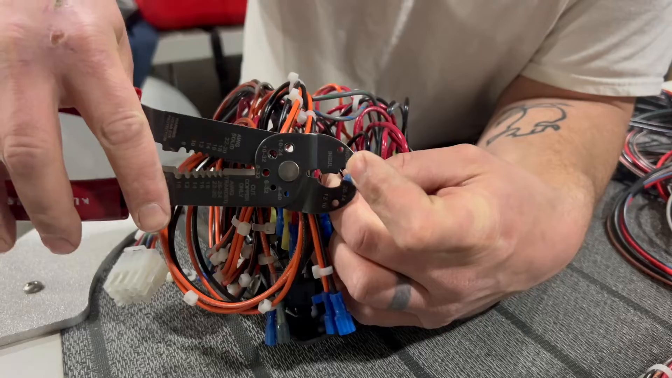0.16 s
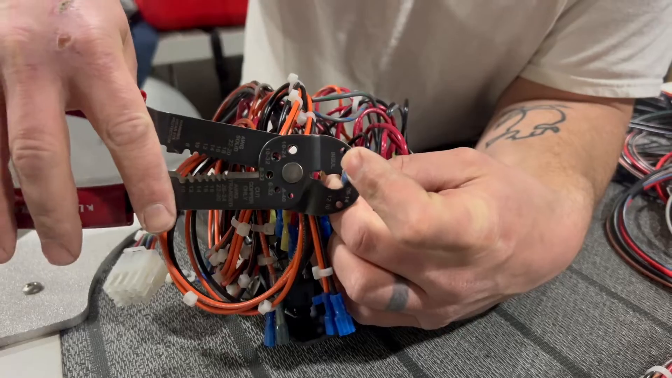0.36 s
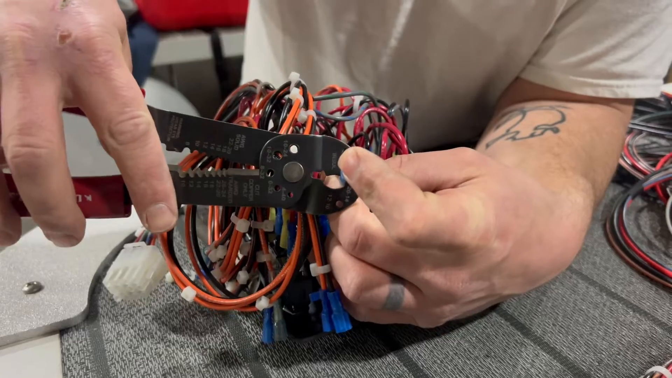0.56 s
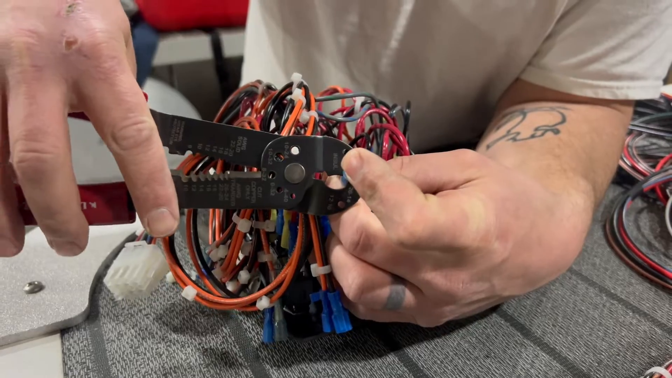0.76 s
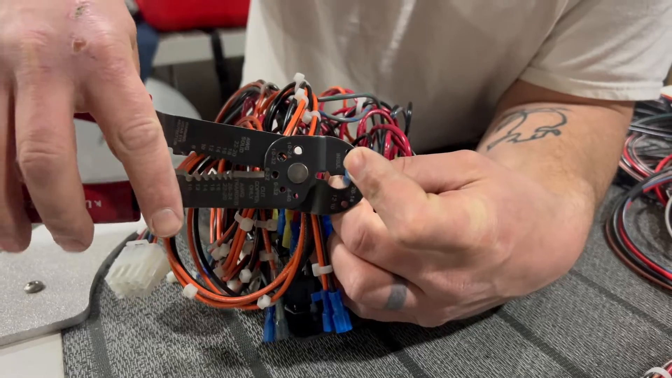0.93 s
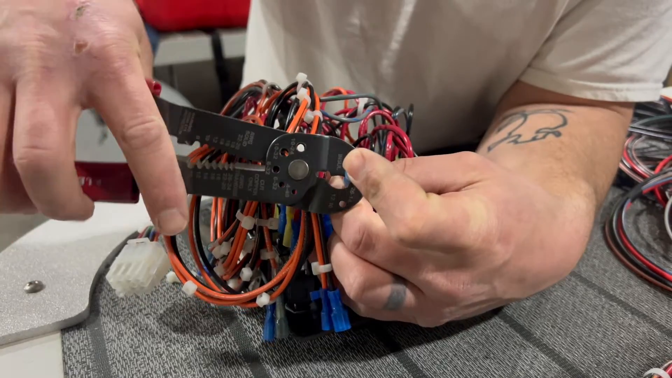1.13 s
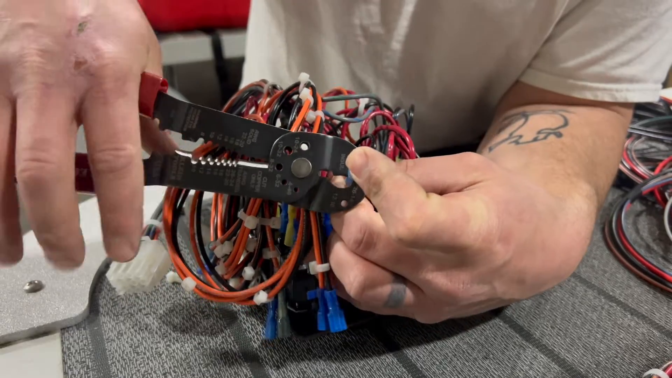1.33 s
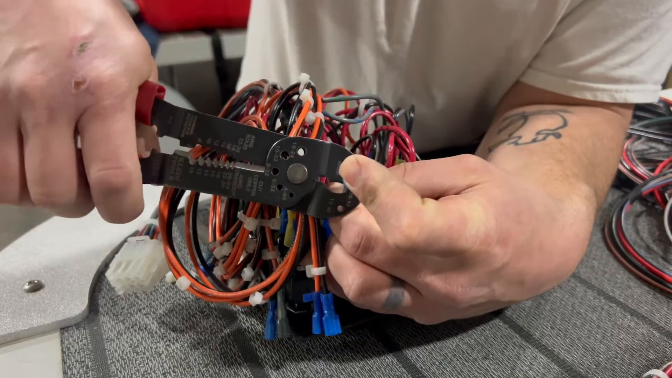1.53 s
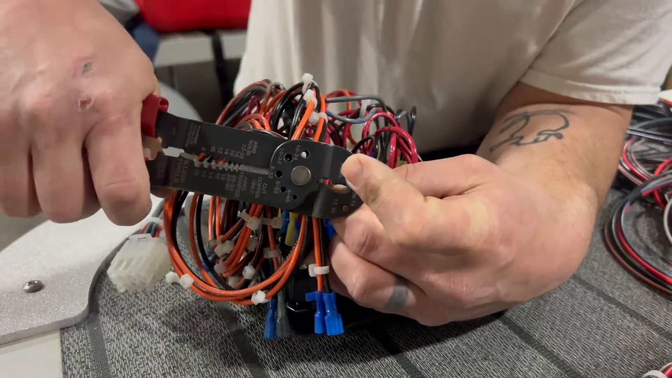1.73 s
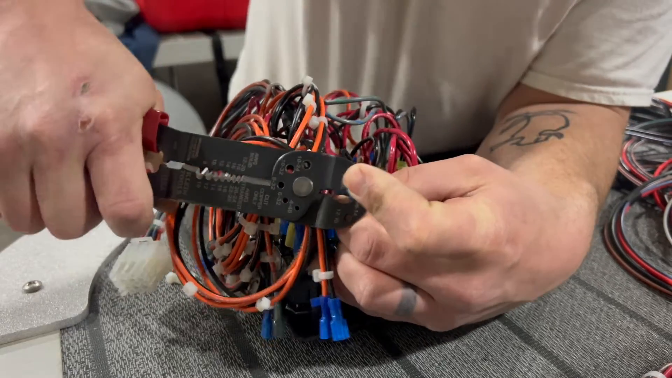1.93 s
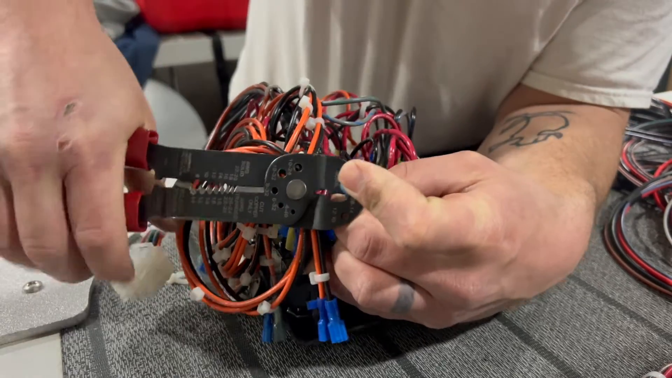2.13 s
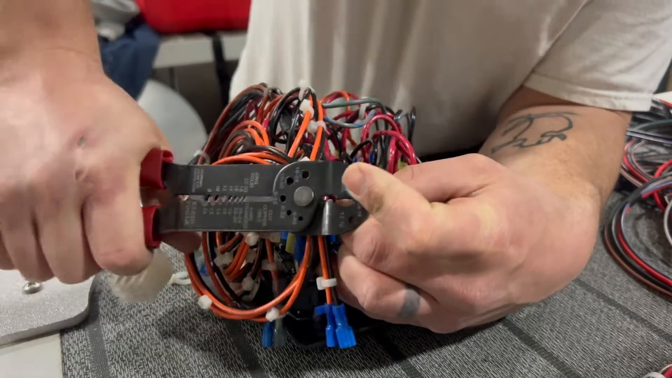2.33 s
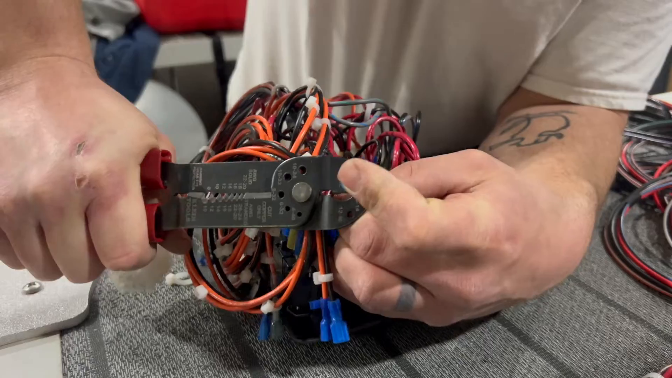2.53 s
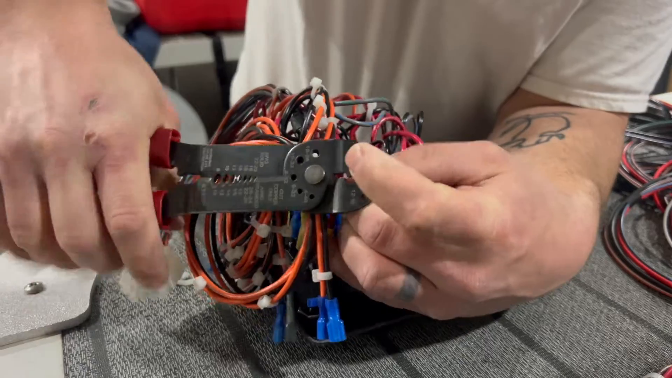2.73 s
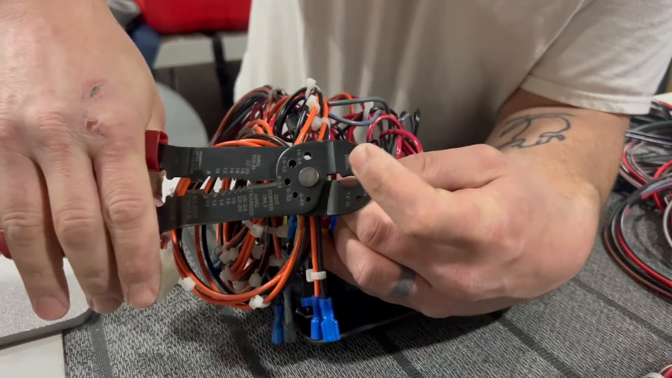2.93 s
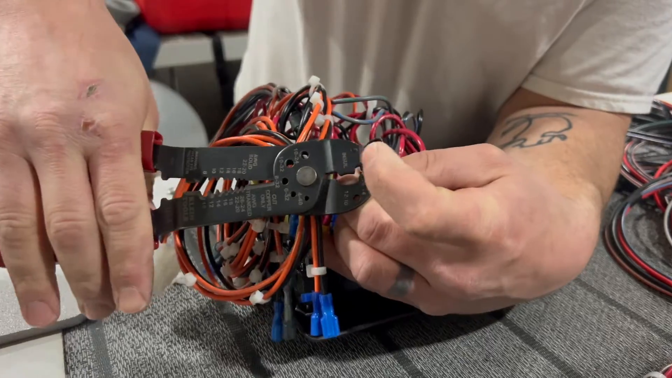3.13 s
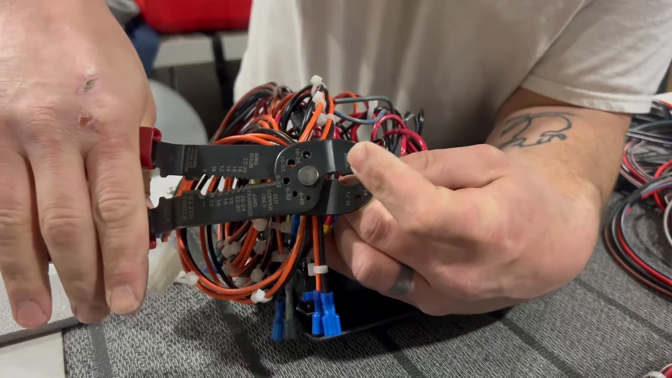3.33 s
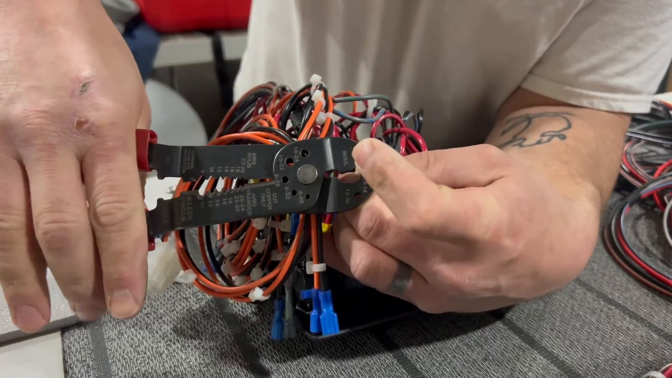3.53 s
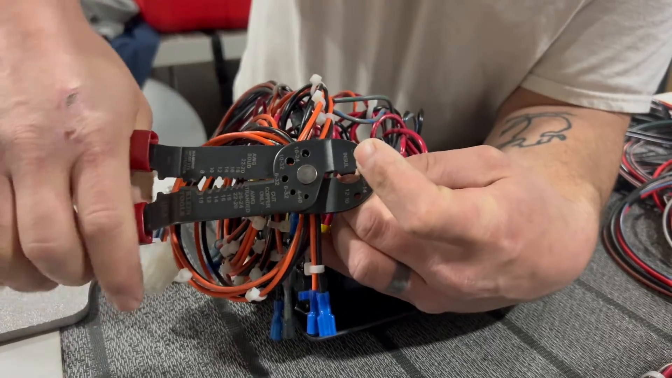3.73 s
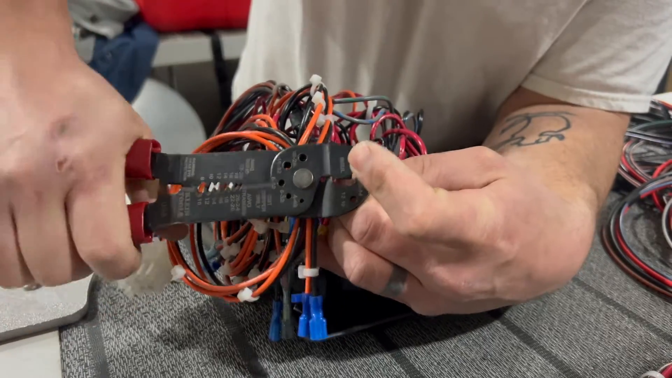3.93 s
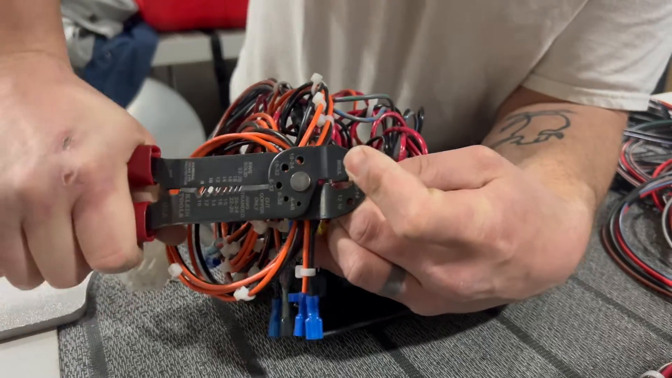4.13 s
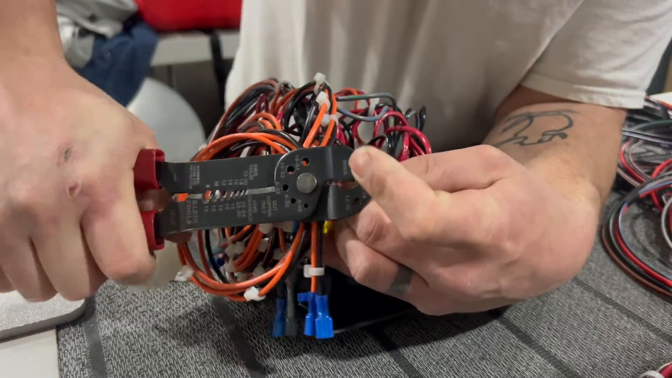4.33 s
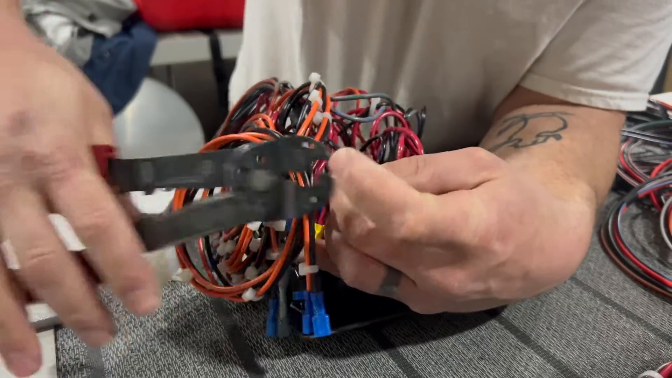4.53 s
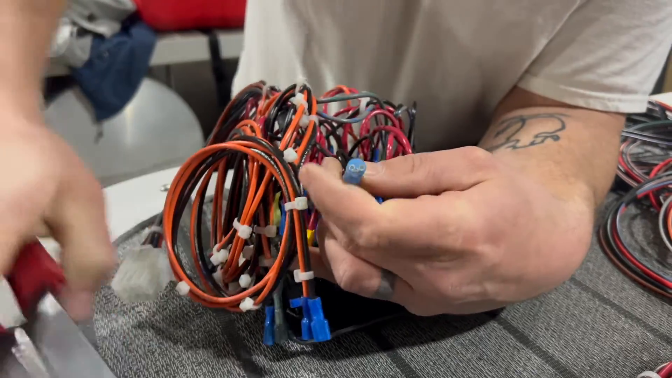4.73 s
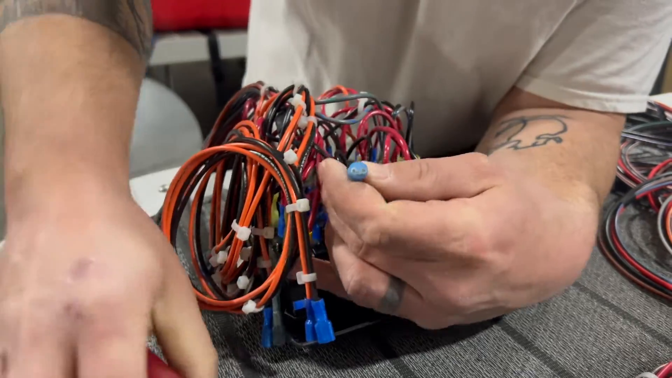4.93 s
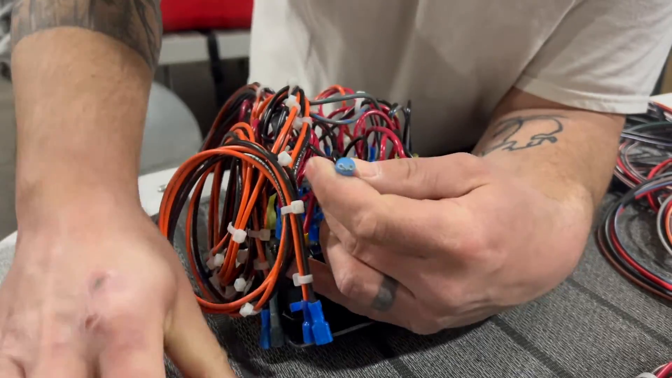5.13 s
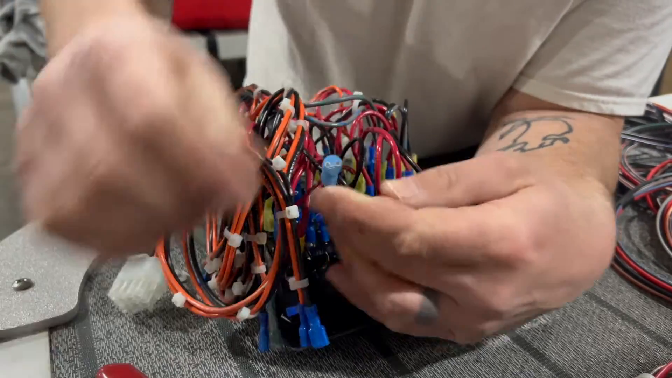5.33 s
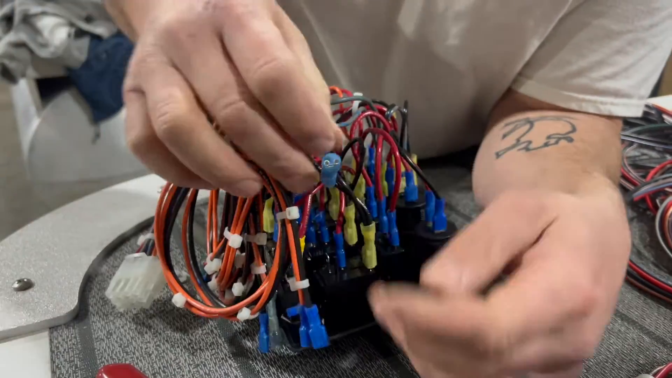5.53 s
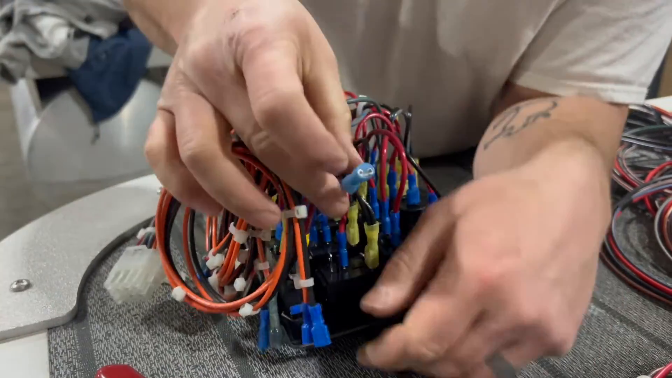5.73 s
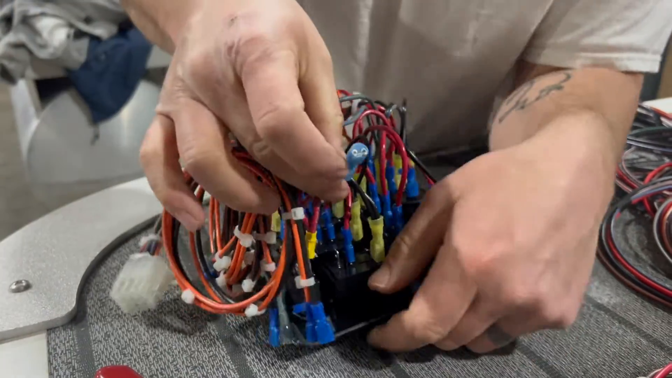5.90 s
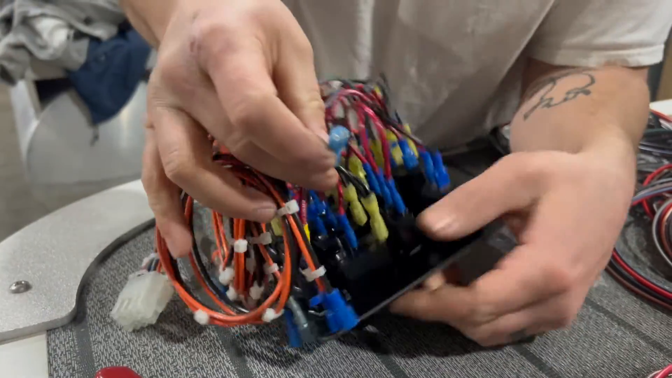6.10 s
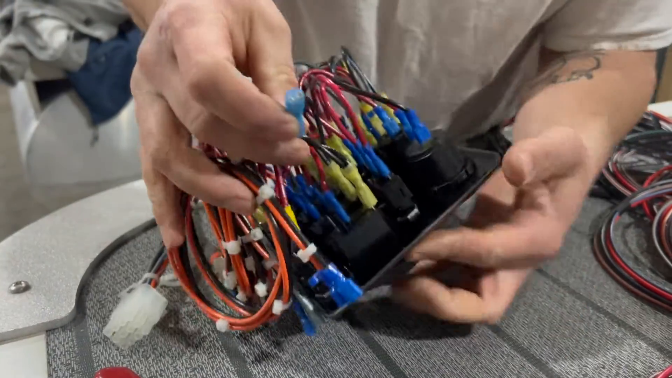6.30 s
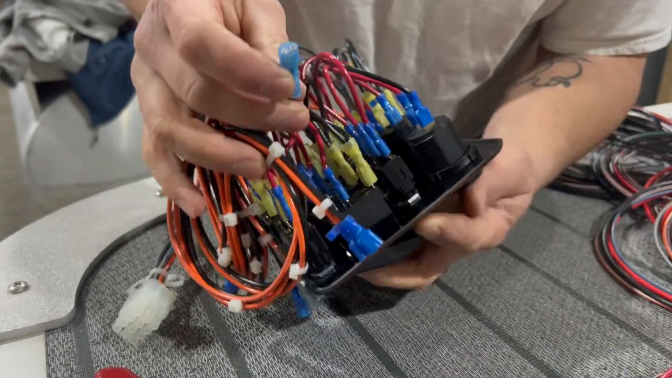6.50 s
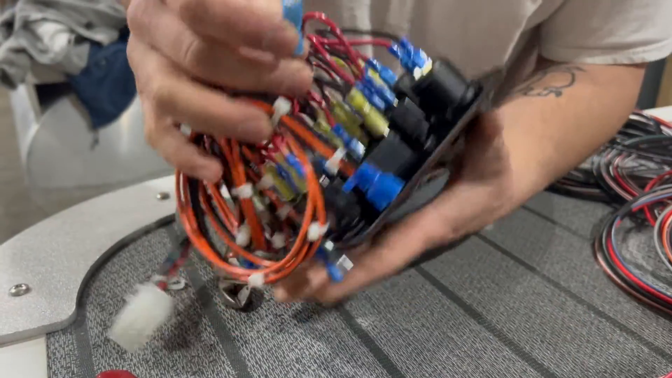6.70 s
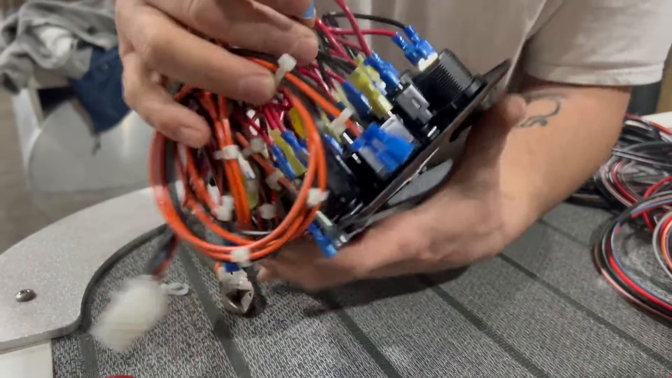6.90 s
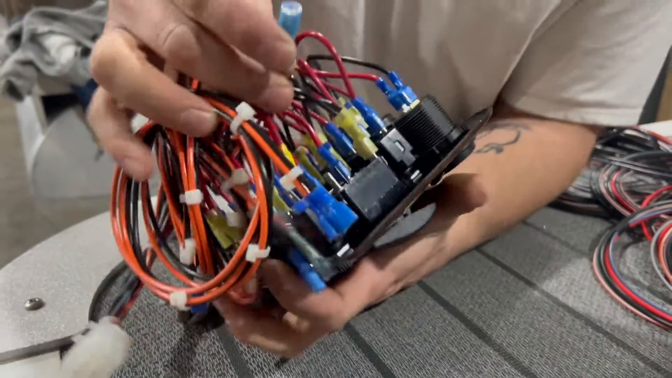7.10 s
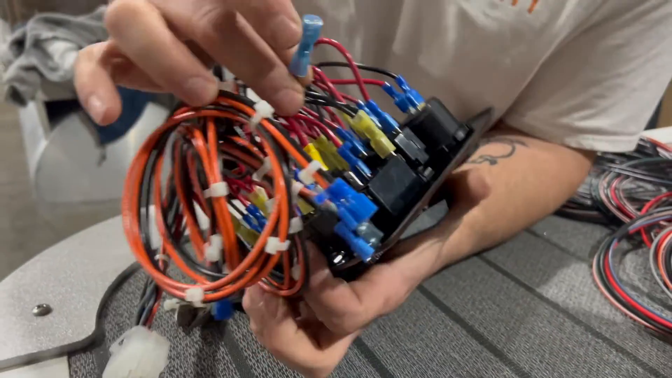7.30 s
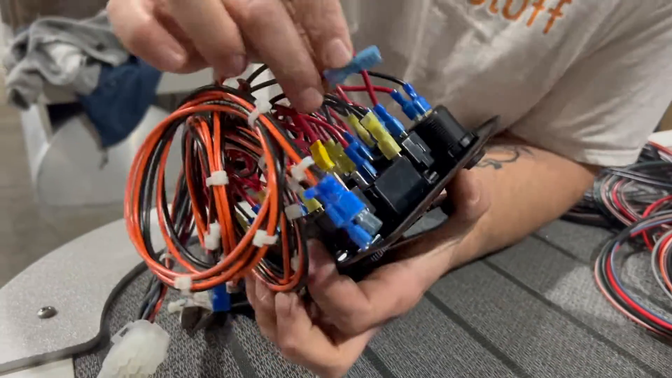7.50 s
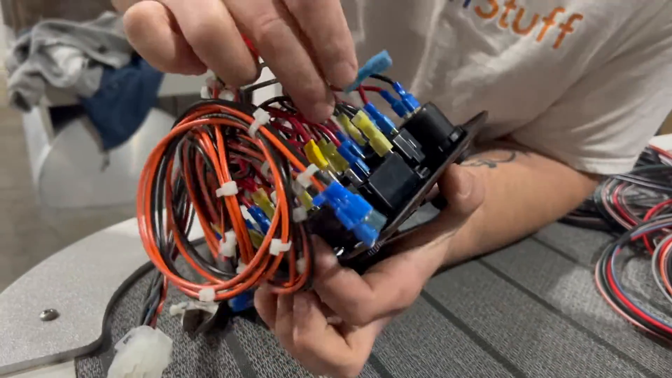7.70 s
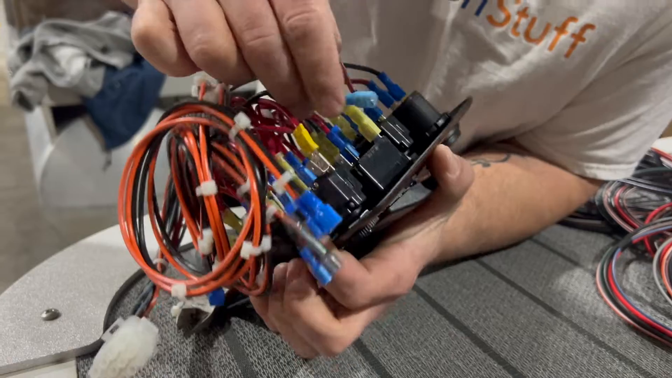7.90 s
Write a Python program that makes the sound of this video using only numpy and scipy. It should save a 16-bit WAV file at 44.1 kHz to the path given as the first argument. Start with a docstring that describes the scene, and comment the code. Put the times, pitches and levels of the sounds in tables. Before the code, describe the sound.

Dry ratcheting metal creaks in three bursts, a bright click, a heavy tool drop with rattle, then soft plastic knocks and wire rustle in a humming workshop.

```python
"""Crimping tool and switch panel

A steel hand crimper is squeezed three times on a wire terminal: runs of falling chirps make dry creaks.
It snaps open and drops on a padded bench: coloured bursts click and clack, dying sine waves thud and ring.
Then a plastic switch panel with its wires is picked up: coloured noise rubs and slides, short bursts knock.
Machinery hums low throughout, from wavering sine waves over noise. Table levels come before function settings.
"""
import sys
import numpy as np
from scipy import signal
from scipy.fft import rfft, irfft
from scipy.io import wavfile
from scipy.ndimage import uniform_filter1d

SR = 44100
rng = np.random.default_rng(int(sys.argv[2]) if len(sys.argv) > 2 else 0)


def digitize_waveform(pressure):
    """Quantize a signal to 16-bit integers and store it at the path in sys.argv[1].

    Rows of a 2-D input are taken as channels; values are limited to [-1, 1].
    """
    field = np.atleast_2d(pressure).T
    bounded = np.clip(field, -1, 1)
    quanta = np.round(bounded * 32767).astype(np.int16)
    wavfile.write(sys.argv[1], SR, quanta)


N = 355181  # length in samples
SIZE = 4096  # samples in one hit
HZ, AGE = np.fft.rfftfreq(SIZE, 1 / SR), np.arange(SIZE) / SR  # frequency and time axes of one hit
# In every spectrum table below, level/dB is relative and taken per Hz, unless stated.


def amp(db):
    """Turns decibels into a plain factor."""
    return 10 ** (np.asarray(db) / 20)


def evened(x):
    """Scales a signal to rms 1."""
    return x / np.sqrt(np.mean(x ** 2) + 1e-20)


def read(points, hz):
    """Reads a table joined by straight lines on a log-frequency axis."""
    f, value = np.transpose(points)
    return np.interp(np.log(hz + 1), np.log(f + 1), value)


def add(mix, s, sound):
    """Adds a sound to the mix from the time s, in seconds."""
    part = mix[:, round(s * SR):][:, :sound.shape[1]]
    part += sound[:, :part.shape[1]]


def tint(x, colour):
    """Gives a long sound a spectrum, at rms 1."""
    gain = amp(read(colour, np.fft.rfftfreq(N, 1 / SR)))
    return evened(irfft(rfft(x) * gain, N))


def hump(hz, width_hz):
    """A broad resonance of height 1."""
    return np.exp(-((HZ - hz) / width_hz) ** 2)


def bending(travel_s):
    """Bending waves carry treble faster than bass; travel_s is the delay at 1 kHz."""
    return np.exp(-4j * np.pi * travel_s * np.sqrt(1000 * HZ))


def scatter(t60, direct=0, lead_s=0):
    """Spectrum of a direct pulse and the short dense ring behind it; the left side lags by lead_s seconds."""
    fade = amp(-60 * AGE / t60) * np.minimum(AGE / 0.00036, 1)
    z = rfft(rng.standard_normal((2, SIZE)) * fade)
    z /= np.sqrt(uniform_filter1d(abs(z) ** 2, size=30, axis=1))  # no broad ripple
    return (z + direct) * np.exp(-2j * np.pi * HZ * np.array([[lead_s], [0]]))


def strike(z, colour_db):
    """Colours a ring causally; its energy is that of a two-millisecond pulse of height 1 on one side."""
    log_gain = np.log(amp(np.maximum(colour_db, -80)))
    mirrored = np.r_[log_gain, log_gain[-2:0:-1]]
    causal = np.exp(np.conj(signal.hilbert(mirrored)))[:len(HZ)]  # minimum phase: nothing sounds early
    y = irfft(z * causal) * np.cos(np.pi / 2 * AGE / AGE[-1]) ** 2
    return y / np.sqrt(np.sum(y ** 2) / 2 / (SR / 1000))


def ring(modes, damping, spread):
    """Dying sine waves, each with its own phase on either side, at peak 1; damping divides their t60."""
    t = np.arange(SR // 2) / SR
    y = 0
    for hz, db, t60 in modes:
        phase = spread * rng.standard_normal((2, 1))
        y = y + amp(db - 60 * t * damping / t60) * np.sin(2 * np.pi * hz * t + phase)
    return y / abs(y).max()


def grains(per_s, spread_db):
    """Countless tiny catches of friction, a few of them large."""
    size = amp(spread_db * np.minimum(rng.exponential(1, N), 5))
    caught = rng.random(N) < per_s / SR
    return size * caught * rng.standard_normal((2, N))


def strokes(rows, rise=0.26):
    """The level of a series of moves: each swells for a share of its length, then dies away."""
    t = np.arange(N) / SR
    level = 0
    for s, length, db in rows:
        progress = np.interp((t - s) / length, [0, np.clip(rise, .05, .95), 1], [0, .5, 1])
        level = level + amp(db) * np.sin(np.pi * progress)
    return level


def resonate(x, hz, width_hz):
    """A narrow resonance that follows the curve hz, at rms 1."""
    turn = np.exp(2j * np.pi * np.cumsum(hz) / SR)
    r = np.exp(-np.pi * width_hz / SR)
    # shift the moving pitch down to zero, smooth it there, and shift it back
    return evened((turn * signal.lfilter([1], [1, -2 * r, r * r], x / turn)).real)


# How alike left and right are: f/Hz, likeness (1 same, 0 unrelated, below 0 opposed)
LIKENESS = [(60, 0.93), (130, 1), (290, 0.5), (640, -0.085), (1400, -0.4), (3000, 0.056), (15000, -0.1)]


def diffuse(size):
    """Noise from all around: the two sides agree well only in the bass."""
    hz = np.fft.rfftfreq(size, 1 / SR)
    a, b = rfft(rng.standard_normal((2, size)))
    same = np.clip(read(LIKENESS, hz), -1, 1)
    # f/Hz, level/dB added on the left and taken off on the right
    lean_db = read([(60, -0.4), (200, -1.92), (400, 1.55), (2400, -0.34), (5000, 2.2), (15000, -2.0)], hz)
    left = a * amp(lean_db)
    right = (same * a + np.sqrt(1 - same ** 2) * b) * amp(-lean_db)
    return irfft(np.array([left, right]), size)


def fits_and_starts():
    """A slow random curve between -1 and 1 that makes hand moves uneven."""
    return np.tanh(tint(rng.standard_normal(N), [(2, 2.0), (8, 5.5), (40, -4.5), (120, -19.5), (300, -59)]))


# Modes of the bench top: f/Hz, level/dB (relative), t60/s (before damping)
BENCH_MODES = [(93, -0.5, 0.29), (112.4, 6.5, 0.18), (162, 2, 0.125), (218, -3.5, 0.11), (264, -11.5, 0.22)]


def thud(db, damping=0.68, travel_s=0.003755):
    """The bench top booms, its deepest modes arriving last."""
    boom = signal.fftconvolve(ring(BENCH_MODES, damping, 0.31), irfft(bending(travel_s))[None], axes=1)
    return amp(db) * boom * amp([[-2.5], [2]])


def knock(db, colour_db, t60=0.086, travel_s=0.003165):
    """A bending wave knocks through a hollow body."""
    return amp(db) * strike(scatter(t60, 1.3, -0.00033) * bending(travel_s), colour_db)


def clack(db, colour_db, tilt_db, t60, direct, lead_s):
    """Hard edges meet; a higher tilt (dB per octave) makes the contact brighter."""
    tilt = tilt_db * np.log2(np.maximum(HZ, 1000) / 4000)
    return amp(db) * strike(scatter(t60, direct, lead_s) * bending(0.001033), colour_db + tilt)


# Steady machinery tones: f/Hz, level/dB (rms), left minus right level/dB
MOTOR_TONES = [(45.1, -46, -1), (66.9, -48, 1), (120.2, -50.5, -3), (132.86, -47.5, -2), (194.6, -71, -16)]
# Spectrum of the moving air: f/Hz, level/dB
AIR_SPECTRUM = [(15, -27), (26, -25.5), (40, -5), (70, -1.5), (120, -2.5), (170, -8.5), (280, -15),
                (400, -19), (700, -22.5), (1200, -26), (2500, -31.5), (3300, -37), (7500, -41),
                (11000, -62.5), (16000, -65)]
AIR_DB = -44.5


def workshop(waver=0.29):
    """Motor hum with a wavering phase, over the rumble and hiss of moving air."""
    t = np.arange(N) / SR
    out = amp(AIR_DB) * tint(diffuse(N), AIR_SPECTRUM)
    for f, db, pan in MOTOR_TONES:
        drift = waver * sum(np.sin(2 * np.pi * (r * t + rng.random())) for r in np.geomspace(.1, 1.5, num=5))
        tone = np.sqrt(2) * np.sin(2 * np.pi * (f * t + rng.random()) + drift)
        out += amp([[db + pan / 2], [db - pan / 2]]) * tone
    return out


# Moves of hands and wires: start t/s, length t/s, level/dB
RUB_MOVES = [(.08, 0.35, -55.5), (1.25, 1.14, -60), (2.7, 0.49, -60.5), (4.12, 0.49, -56.5),
             (5.2, 0.88, -59), (5.79, 0.38, -51), (6.15, 0.33, -56), (6.58, 0.76, -62.5),
             (6.92, 0.3, -59.5), (7.7, 0.16, -66.5)]
# Spectrum of the rubbing: f/Hz, level/dB
RUB_SPECTRUM = [(30, -19.5), (70, -1), (200, 12), (500, 2), (1000, 3), (1700, -6), (2600, -3), (4000, -5),
                (7000, -10), (10000, -30.5), (15000, -31)]
# Spectrum of hard plastic, also used for the panel: f/Hz, level/dB
PLASTIC_SPECTRUM = [(600, -15.5), (1100, 6.5), (1450, 8.5), (1800, 9), (2200, 10.5), (2800, 5), (3300, 7.5),
                    (5000, -3), (9000, 1), (10500, -36), (12000, -1.5), (15500, -41)]
RUB_RISE = 0.23  # share of a move spent swelling
TOUCHES_PER_S, TOUCH_SPREAD_DB = 60, 2.0  # wires and connectors touch
HELD_FROM_S, HELD_DB = 5.5, -65  # once lifted, the wire bundle goes on rustling faintly


def rubbing(fits, uneven_db=3.5, ticks_db=-15):
    """Skin and wires rub by fits and starts, with small ticks where wires and connectors touch."""
    held = amp(HELD_DB) * (np.arange(N) / SR > HELD_FROM_S)
    ticks = amp(ticks_db) * tint(grains(TOUCHES_PER_S, TOUCH_SPREAD_DB), PLASTIC_SPECTRUM)
    friction = tint(grains(3000, 0.36), RUB_SPECTRUM)
    level = np.hypot(strokes(RUB_MOVES, RUB_RISE), held)
    return amp(uneven_db * fits) * (ticks + friction) * level


# Slips in the squeezes, and single ticks as the jaws settle: t/s, level/dB, ring f/Hz,
# top treble level/dB, handle ring level/dB
SLIP_TICKS = [(.166, -53, 7500, -7, -10), (.199, -53, 7000, -6, -6), (1.1817, -49, 6350, -3, 0),
              (1.2646, -36.5, 8500, 0, -4), (1.3188, -43.5, 6300, -17, 0), (1.466, -32, 5900, -2, -3),
              (1.474, -34.5, 8300, 6, 0), (1.6204, -50, 6600, 4, 0), (1.6305, -39.5, 7980, 9, 0),
              (1.6565, -37, 7000, -6, 0), (1.6733, -32, 8600, -6, 0), (1.6931, -30, 8600, -1, -1),
              (1.7173, -27, 6900, 2, 4), (1.743, -24.5, 8500, 0, -1), (1.7653, -24, 6800, -1, 4),
              (1.784, -23.5, 8500, 3, 13), (1.8017, -24.5, 6760, -2, 5), (1.8199, -22.5, 8600, 0, 9),
              (1.841, -22.5, 6600, -1, 11), (1.8658, -20, 6850, -3, 6), (1.9985, -28.5, 6300, -7, 10),
              (2.2898, -41, 9000, -6, 0), (2.2967, -34, 8950, -6, 7), (2.3055, -29.5, 8800, -4, 2),
              (2.3144, -30.5, 8800, -2, 0), (2.325, -26.5, 8800, 3, -2), (2.3378, -25, 8700, 5, 5),
              (2.3531, -24, 8450, 0, 11), (2.3721, -21, 7500, 1, 4), (2.393, -25, 6600, 1, 10),
              (2.4238, -21.5, 7700, 2.5, 7), (2.6513, -37.5, 6700, -5, 11), (3.922, -39.5, 7500, -2, -3),
              (3.9868, -36.5, 7650, 7, 0), (4.0005, -30, 7500, -3, 1), (4.0114, -29, 7600, 0, 0),
              (4.0231, -25.5, 7500, -1, -3), (4.0401, -25.5, 7300, 0, 4), (4.0611, -23, 7500, 3, 11),
              (4.0832, -23, 7200, 1, 10), (4.106, -22, 6700, 4, 7), (4.132, -22.5, 7000, 2, 4),
              (4.367, -44, 6300, -15, -6), (4.415, -41, 6600, -9, -4), (4.476, -51, 7000, 7, -7)]
# Times when the hand takes a new grip between squeezes: t/s
REGRIP_TIMES = [2.15, 3.5]
# Each squeeze loads the steel differently: f/Hz, level/dB
SQUEEZE_1 = [(300, -25), (500, -13), (820, 3), (1060, -5), (1290, -2), (1600, -9), (1950, -1), (2400, -4),
             (2750, -4), (3060, 3), (3500, 0), (4000, 0), (4600, 0), (5170, 3), (5550, -1), (6150, 4),
             (6900, 6), (7500, 5), (7970, 2), (8600, 8), (9070, 5), (10400, -2.5), (12400, 5), (13780, -6),
             (15460, 4), (16280, -8)]
SQUEEZE_2 = [(300, -25), (500, -8), (820, 10), (1230, -1), (1500, 2), (1950, 6.5), (2250, 5), (2650, -2),
             (3350, 5.5), (4050, -3), (4600, 0), (5210, 3.5), (5600, -1), (6370, 1.5), (7240, 9), (7800, 6),
             (8800, 5.5), (9700, -4), (11200, -2), (12400, 2), (13420, 1.5), (15400, -2.5), (16280, -14)]
SQUEEZE_3 = [(300, -25), (500, -4), (800, 10), (1230, 3), (1500, -1), (2100, 1.5), (2450, -2), (3000, 2),
             (3450, 4), (4100, -6), (4550, -1), (5190, 5.5), (5750, -0.5), (6370, 3), (7200, 8), (7950, -1),
             (8600, 3), (9320, -4), (10600, -1), (12200, 4), (13760, -9), (14940, -5), (16280, -17)]
# Phase between the two sides in the squeezes: f/Hz, phase lead of the left (radians)
SIDE_PHASE = [(500, -1.5), (800, 1.5), (1400, 2.5), (2000, 2.5), (2700, 4.5), (3300, 4.5), (4000, 7),
              (5200, 8.3), (6000, 7.5), (6600, 3.5), (7300, 4.5), (8500, -0.5), (10500, -5), (12000, -6),
              (15300, -12)]
HANDLE_HZ, HANDLE_WIDTH_HZ = 2030, 330  # the broad resonance of the handles


def creaks(level_db=-3.5, t60=0.015, change=0.88, direct=1.5, travel_s=.0035,
           ring_db=3, ring_width_hz=750, vary_db=1.34):
    """Each slip sends much the same bending wave down the handles: a tiny falling chirp."""
    out, grip = np.zeros((2, N)), scatter(t60, direct)
    path = bending(travel_s) * np.exp(1j * read(SIDE_PHASE, HZ) * np.array([[1], [0]]))
    for s, db, hz, top_db, handle_db in SLIP_TICKS:
        squeeze = [SQUEEZE_1, SQUEEZE_2, SQUEEZE_3][np.searchsorted(REGRIP_TIMES, s)]
        colour = read(squeeze, HZ)
        colour += ring_db * hump(hz, ring_width_hz)
        colour += handle_db * hump(HANDLE_HZ, HANDLE_WIDTH_HZ)
        colour += read([(9000, 0), (11500, top_db)], HZ)
        # no two slips catch alike
        colour += vary_db * evened(uniform_filter1d(rng.standard_normal(len(HZ)), size=70))
        wave = (grip + change * scatter(t60, 0.48)) * path
        add(out, s, amp(db + level_db) * strike(wave, colour))
    return out * amp([[1], [-1]])


# Soft scrapes as the jaws close on the terminal: start t/s, length t/s, level/dB
SCRAPE_MOVES = [(1.40, 0.41, -62), (1.74, 0.28, -60)]
# Spectrum of the scrape: f/Hz, level/dB
SCRAPE_SPECTRUM = [(500, -26), (950, 4), (1600, 5), (2100, -5), (2500, -2), (2950, -14), (7000, -25)]
# The wavering pitch of a thin squeal in the scrape: t/s, f/Hz
SQUEAL_PITCH = [(1.45, 2650), (1.52, 2400), (1.56, 2560), (1.62, 2430), (1.86, 2570), (1.93, 2350)]
SQUEAL_WIDTH_HZ = 250


def scraping(squeal_db=-2.5):
    """The closing jaws scrape: tiny catches of friction, some through a narrow moving resonance."""
    pitch = np.interp(np.arange(N) / SR, *np.transpose(SQUEAL_PITCH))
    squeal = amp(squeal_db) * resonate(grains(2040, 1.3)[0], pitch, SQUEAL_WIDTH_HZ)
    return strokes(SCRAPE_MOVES) * (tint(grains(2100, 1.3)[0], SCRAPE_SPECTRUM) + squeal)


# Insulation slides through the fingers: t/s at the height of the move, length t/s, level/dB
SLIDE_MOVES = [(2.83, 0.35, -66.5), (4.2, .14, -72), (4.43, .08, -63), (4.73, .07, -61), (4.96, 0.16, -68),
               (5.68, 0.061, -63), (5.76, .2, -62), (6.177, 0.054, -54.5), (6.297, 0.045, -57),
               (6.41, 0.072, -60.5), (6.71, 0.047, -57.5), (6.93, 0.16, -75), (7.15, 0.12, -64.5)]
# Spectrum of the sliding: f/Hz, level/dB
SLIDE_SPECTRUM = [(2000, -10), (6000, 6.5), (9000, 0.5), (12500, 1.5), (15500, -2)]


def sliding(fits, uneven_db=2.5):
    """Smooth insulation slides with a hiss that swells and fades."""
    t = np.arange(N) / SR
    swells = sum(amp(db) / (1 + ((t - s) / length) ** 2 * 2) ** 2 for s, length, db in SLIDE_MOVES)
    return swells * tint(grains(4000, 1.1), SLIDE_SPECTRUM) * amp(uneven_db * fits)


# The wires of the bundle chafe against each other: start t/s, length t/s, level/dB
CHAFE_MOVES = [(4.14, 0.28, -60.5), (5.82, 0.45, -56.5), (6.5, 0.7, -62.5)]
# Spectrum of the chafing: f/Hz, level/dB
CHAFE_SPECTRUM = [(400, -12), (750, 9), (1200, 10), (1900, 15), (2200, 9), (2600, 14.5), (3200, 0),
                  (4500, -4), (7000, -28), (10000, -56)]
CATCHES_PER_S, CATCH_SPREAD_DB = 600, 2.3


def chafing():
    """Wire catches on wire in many small random jerks."""
    return strokes(CHAFE_MOVES, RUB_RISE) * tint(grains(CATCHES_PER_S, CATCH_SPREAD_DB), CHAFE_SPECTRUM)


# The jaws spring open: t/s, level/dB
SNAP_CLICKS = [(4.7, -12.5), (4.719, -37), (4.736, -44.5)]
# Spectrum of the snap: f/Hz, level/dB
SNAP_SPECTRUM = [(250, -16), (600, -15), (1200, -17.5), (2150, -9), (2500, -12), (3200, 3.5), (3900, -12),
                 (4450, 0), (4900, 5), (5600, -9), (6450, 4.5), (8000, -4), (9100, 6.5), (10200, -24),
                 (11700, 2), (13600, -13), (15000, -12), (16300, -23.5)]


def snaps(level_db=-2.5, t60=0.012, jolt_db=-25):
    """The jaws let go with a dry, bright click and two fainter ones, each with a soft low thud."""
    out = np.zeros((2, N))
    for s, db in SNAP_CLICKS:
        wave = scatter(t60, 0.32, 0.00019) * bending(0.004)
        add(out, s, amp(db + level_db) * strike(wave, read(SNAP_SPECTRUM, HZ)))
        add(out, s, thud(db + jolt_db))
    return out * amp([[1.3], [-1.3]])


# The tool lands on the bench: t/s, bench thud level/dB, hollow knock level/dB, knock f/Hz,
# bench frame ring level/dB
TOOL_LANDINGS = [(4.998, -15.5, -12, 208, -57.5), (5.033, -22, -26.5, 200, -47),
                 (5.145, -16, -10, 326, -36), (5.158, -33, -14, 630, -18), (5.181, -16, -23, 230, -18.5),
                 (5.197, -28, -20.5, 160, -21.5)]
# Its loose handles and jaws rattle: t/s, clack level/dB, tilt (dB per octave)
TOOL_RATTLES = [(4.9988, -23, -5.5), (5.002, -22.5, -7), (5.033, -39, 3), (5.146, -21.5, -2),
                (5.153, -12.5, 1), (5.158, -6.5, -2), (5.163, -12, 6), (5.167, -11, -0.5),
                (5.1802, -13, -3.5), (5.1905, -16, 4.5), (5.197, -23.5, -10), (5.203, -24, -7)]
# Spectrum of the hollow knock: f/Hz, level/dB
KNOCK_SPECTRUM = [(70, -19), (130, -1), (210, 4), (300, -3.5), (380, -1), (470, 2.5), (570, -2), (690, -2),
                  (830, -12.5), (950, -26), (1200, -11), (2000, -24.5), (4000, -42)]
# Spectrum of steel on the bench: f/Hz, level/dB
CLACK_SPECTRUM = [(590, -19), (900, -10.5), (1100, 0), (1500, -5.5), (2000, -3), (2450, -3.5), (3050, 3.5),
                  (3700, 0.5), (4700, 7), (5700, 1.5), (6330, 6), (7200, -3), (8360, 5), (10500, -14.5),
                  (12000, 5.5), (13800, -6), (16000, -7)]
# Modes of the bench frame: f/Hz, level/dB (relative), t60/s (before damping)
FRAME_MODES = [(318, 0, .2), (344, 2, .33), (423, -6, .25), (539, -2, .13), (587, -4, .12), (656, 4, .17),
               (770, -11, .2), (829, -16, .26), (1179, -8, .13)]
# Modes of the steel jaws and handles: f/Hz, level/dB (relative), t60/s
STEEL_MODES = [(2694, -3, 0.12), (3050, -6, 0.06), (4429, -4, 0.06), (4686, 5, 0.09), (4864, 4, .08),
               (5049, 2, 0.08), (6352, 2, 0.07), (8440, -6, 0.04), (11800, -4, .03), (14700, -3, .03)]


def dropped_tool(thud_db=0, knock_db=2, pitch_db=7, pitch_width=0.2, clack_db=-4, t60=0.036, steel_db=-15):
    """Each landing thuds the bench and sets its frame ringing; the loose steel rattles in separate clacks."""
    out = np.zeros((2, N))
    for s, low_db, mid_db, hz, frame_db in TOOL_LANDINGS:
        colour = read(KNOCK_SPECTRUM, HZ) + pitch_db * hump(hz, pitch_width * hz)
        add(out, s, thud(low_db + thud_db))
        add(out, s - .001, knock(mid_db + knock_db, colour))
        add(out, s, amp(frame_db) * ring(FRAME_MODES, 0.84, 0.35))
    for s, db, tilt_db in TOOL_RATTLES:
        hit = clack(db + clack_db, read(CLACK_SPECTRUM, HZ), tilt_db, t60, 0.56, -0.000448)
        add(out, s, hit * amp([[0.7], [-0.7]]))
        add(out, s, amp(db + steel_db) * ring(STEEL_MODES, 1, 1.62))
    return out


# Spectrum of everything on the bench shuddering: f/Hz, level/dB
SHUDDER_SPECTRUM = [(150, -24), (250, 0.5), (350, 6), (420, -1), (510, -10), (670, -2.5), (830, 5),
                    (930, -12), (1450, -4), (2000, -19), (5000, -43.5)]
SHUDDER_S, SHUDDER_DB, SHUDDER_T60 = 5.16, -36, .6  # start in s, level in dB, time to fall 60 dB in s


def shudder():
    """After the hardest landing, a diffuse low clatter swells quickly and dies away."""
    age = np.maximum(np.arange(N) / SR - SHUDDER_S, 0)
    level = np.minimum(age / .02, 1) * amp(SHUDDER_DB - 60 * age / SHUDDER_T60)
    return level * tint(diffuse(N), SHUDDER_SPECTRUM)


# The panel bumps as it is picked up: t/s, bench thud level/dB, hollow knock level/dB, knock f/Hz,
# hard clack level/dB, clack f/Hz, tilt (dB per octave)
PANEL_BUMPS = [(5.459, -45, -47, 400, -42, 2970, -5.5), (5.797, -56, -32.5, 650, -41, 3500, 4),
               (5.819, -31, -31.5, 740, -32, 3400, 2), (5.865, -31.5, -42, 400, -35, 2020, 0),
               (5.937, -46, -34.5, 720, -38, 2600, -2), (6.001, -26, -28.5, 490, -29.5, 1850, -6),
               (6.169, -28.5, -28.5, 754, -23, 1370, 1), (6.185, -30, -28, 594, -34, 2410, 2),
               (6.209, -29.5, -31.5, 325, -47, 2000, -2), (6.243, -49, -36.5, 446, -49, 2400, 0),
               (6.482, -53, -40.5, 650, -48, 2280, -7), (6.506, -66, -45, 397, -36.5, 2100, 1.5),
               (6.932, -58, -50, 400, -40.5, 3800, 1.5), (6.95, -60, -47.5, 400, -43, 4200, 5),
               (7.045, -26.5, -35, 520, -34, 2290, 3), (7.065, -47, -23, 400, -38, 1400, 1),
               (7.075, -29.5, -30.5, 290, -22, 2170, -2.5), (7.097, -44, -38, 403, -40, 1700, -4),
               (7.157, -31, -50.5, 400, -38, 4200, 5), (7.766, -56, -51, 400, -39, 1915, -5)]
# Spectrum of the hollow panel: f/Hz, level/dB
HOLLOW_SPECTRUM = [(100, -2), (200, 3), (275, 13.5), (420, 10), (560, -6), (750, -1), (1000, -19),
                   (2000, -27), (4000, -42)]


def panel(thud_db=0, knock_db=3, pitch_db=11, pitch_width=0.22, clack_db=-4, t60=0.036,
          ring_db=9, ring_width_hz=190):
    """The hollow plastic panel bumps on the bench; corners knock and connectors clack at listed pitches."""
    out = np.zeros((2, N))
    for s, low_db, mid_db, knock_hz, top_db, hz, tilt_db in PANEL_BUMPS:
        hollow = read(HOLLOW_SPECTRUM, HZ) + pitch_db * hump(knock_hz, pitch_width * knock_hz)
        hard = read(PLASTIC_SPECTRUM, HZ) + ring_db * hump(hz, ring_width_hz)
        add(out, s, thud(low_db + thud_db))
        add(out, s - .001, knock(mid_db + knock_db, hollow))
        add(out, s, clack(top_db + clack_db, hard, tilt_db, t60, 0.24, -0.00031))
    return out


# Colour of the reflections: f/Hz, level/dB (relative, not per Hz)
WALL_COLOUR = [(100, -6), (350, 2), (800, -12), (1500, -2.5), (6000, -1.5), (15000, -9.5)]
# How long the room rings: f/Hz, t60/s
ROOM_DECAY = [(100, 0.99), (400, 0.97), (1500, 0.67), (5000, 0.32), (15000, 0.27)]


def room(x, wet_db=-18):
    """A faint diffuse tail, its treble dying first."""
    hz, t, z = signal.stft(diffuse(SR), SR, nperseg=256)
    fade_db = read(WALL_COLOUR, hz)[:, None] - 60 * t / read(ROOM_DECAY, hz)[:, None]
    tail = signal.istft(z * amp(fade_db), SR, nperseg=256)[1]
    tail *= np.minimum(np.arange(tail.shape[1]) / SR / 0.0084, 1)  # builds up over 8.4 ms
    return amp(wet_db) * signal.fftconvolve(x, tail / np.linalg.norm(tail[0]), axes=1)[:, :N]


def scene(creak_room_db=-5, snap_room_db=-6, drop_room_db=-2):
    """The jaws are nearest the listener, so less of them is heard from the room."""
    machinery = workshop()
    fits = fits_and_starts()
    hands = rubbing(fits) + scraping() + sliding(fits) + chafing() + panel()
    creak, snap, drop = creaks(), snaps(), dropped_tool() + shudder()
    sent = amp(creak_room_db) * creak + amp(snap_room_db) * snap + amp(drop_room_db) * drop + hands
    return creak + snap + drop + hands + room(sent) + machinery


EDGE_HZ = 16400


def record(dry):
    """A steep low-pass filter removes the treble above EDGE_HZ."""
    low_pass = signal.firwin(255, EDGE_HZ, window=("kaiser", 9), fs=SR)
    return signal.oaconvolve(dry, low_pass[None], "same")


dry = scene()
out = record(dry)
digitize_waveform(out)
```